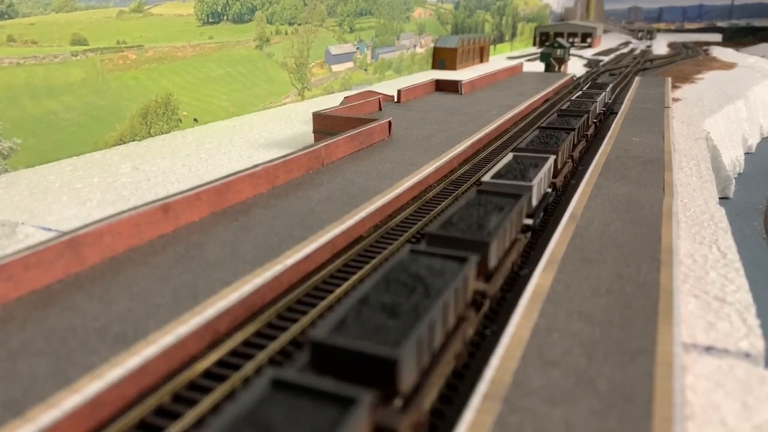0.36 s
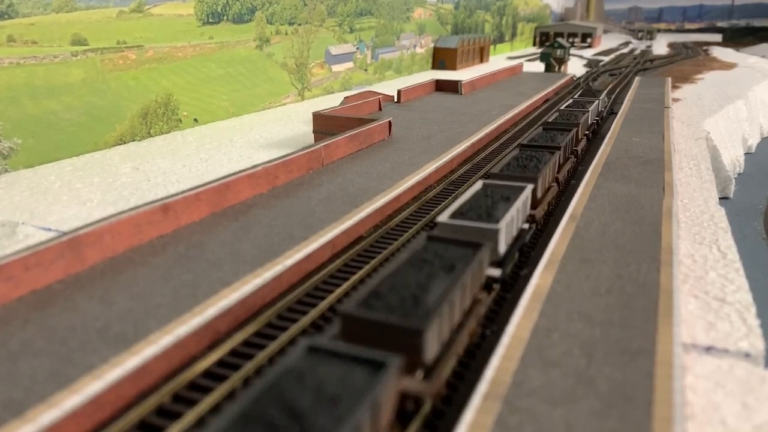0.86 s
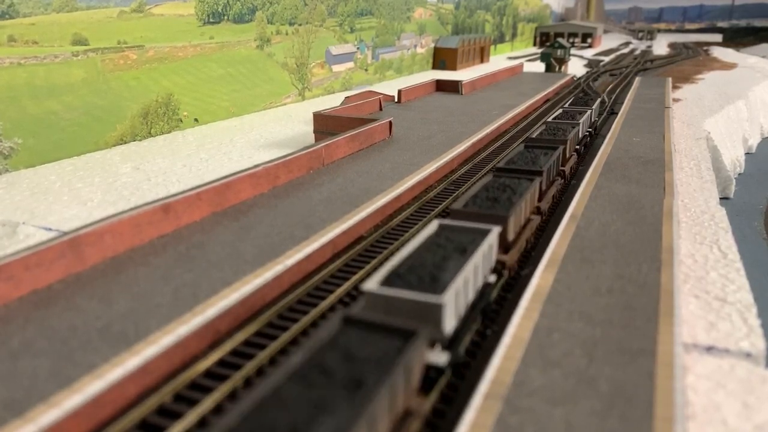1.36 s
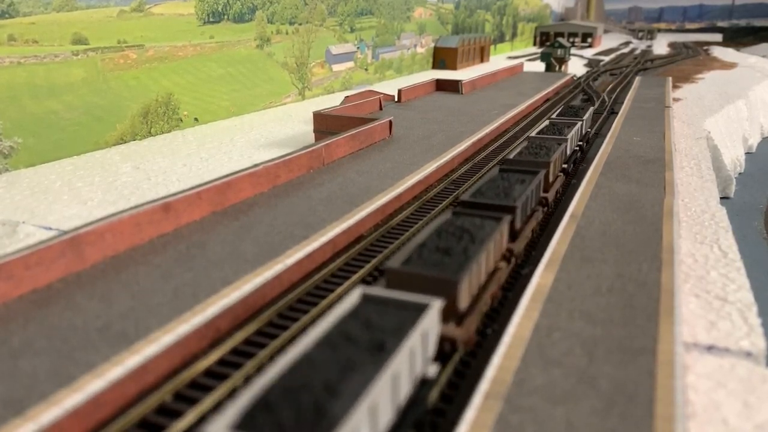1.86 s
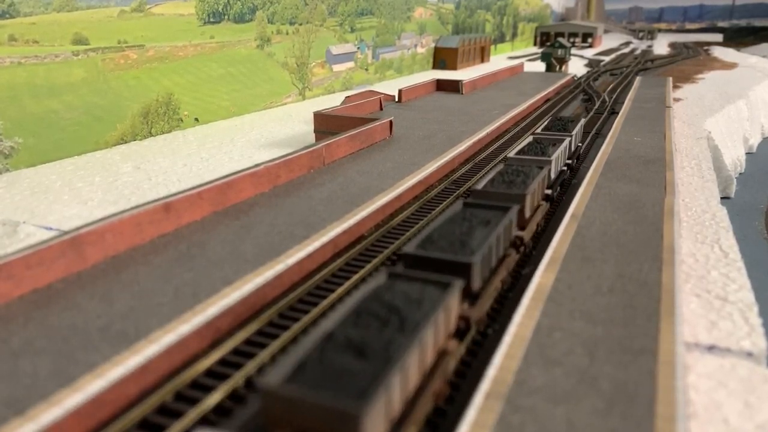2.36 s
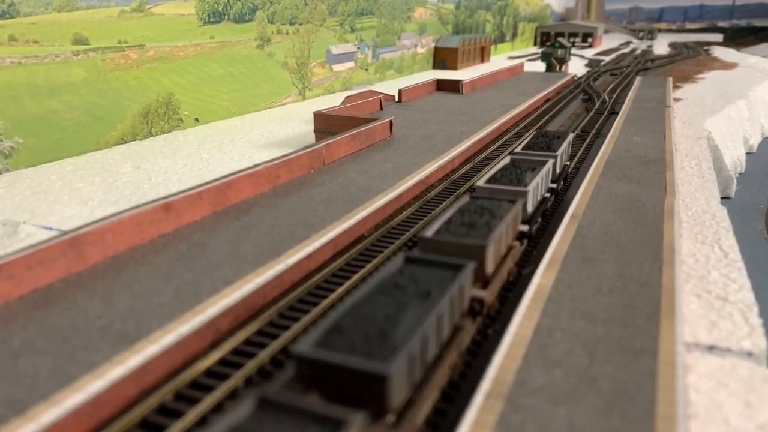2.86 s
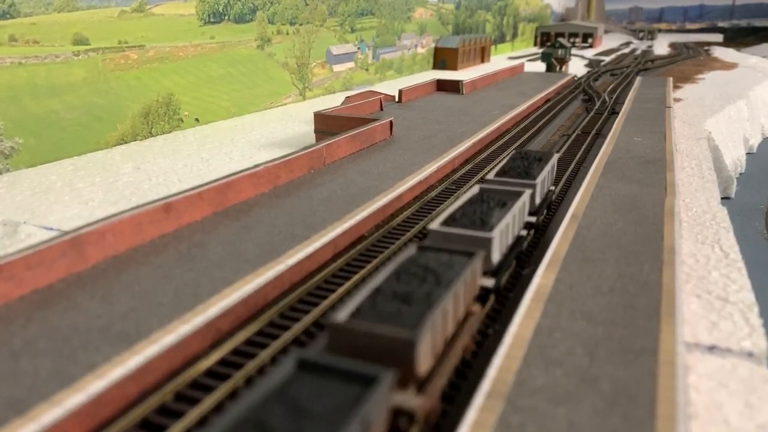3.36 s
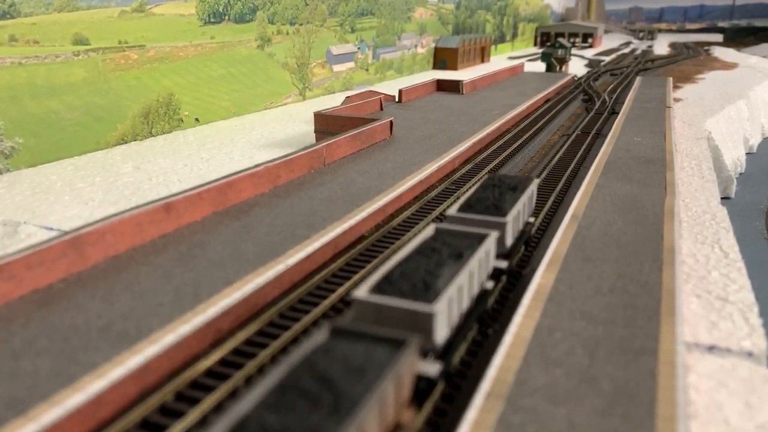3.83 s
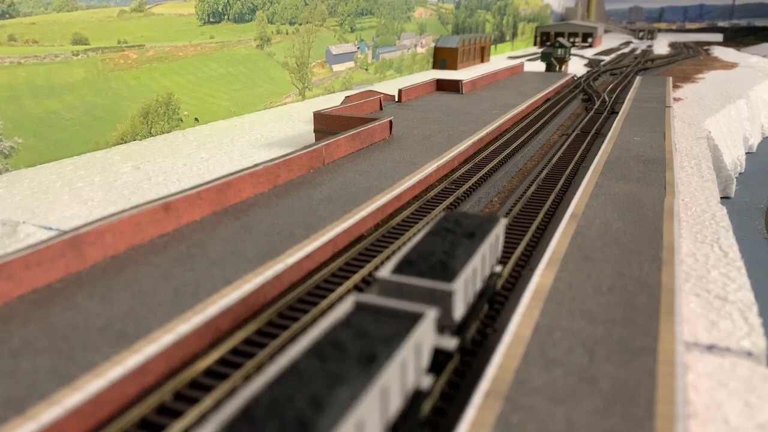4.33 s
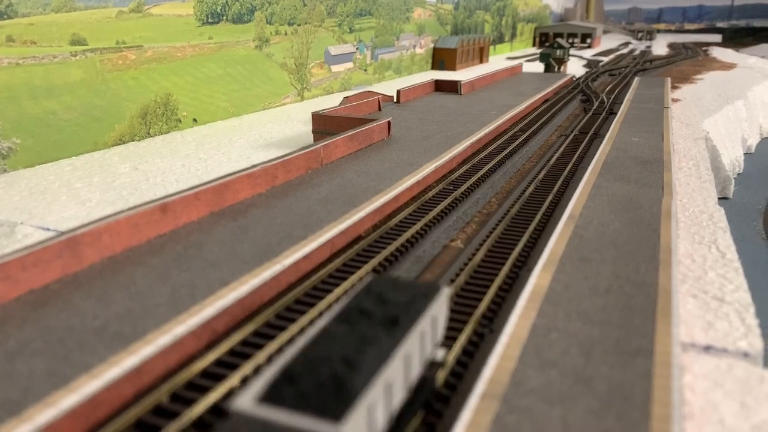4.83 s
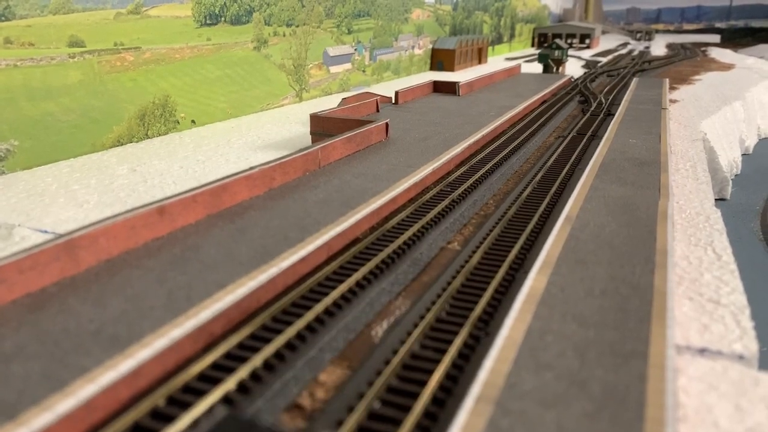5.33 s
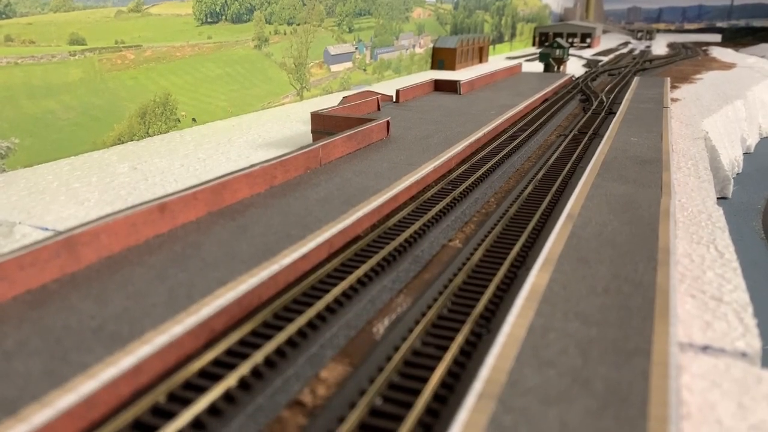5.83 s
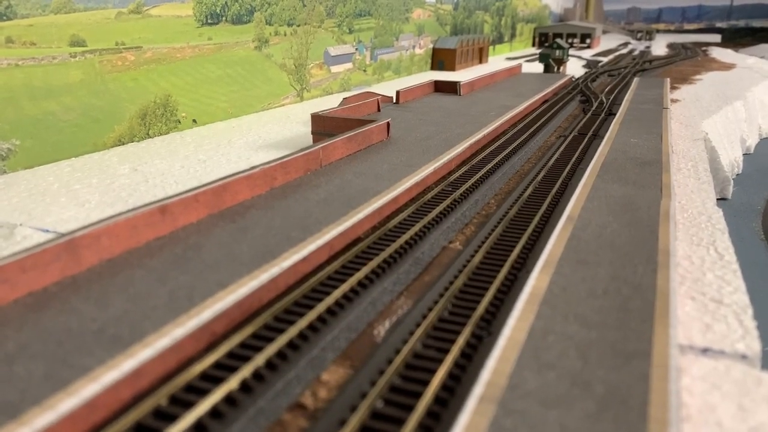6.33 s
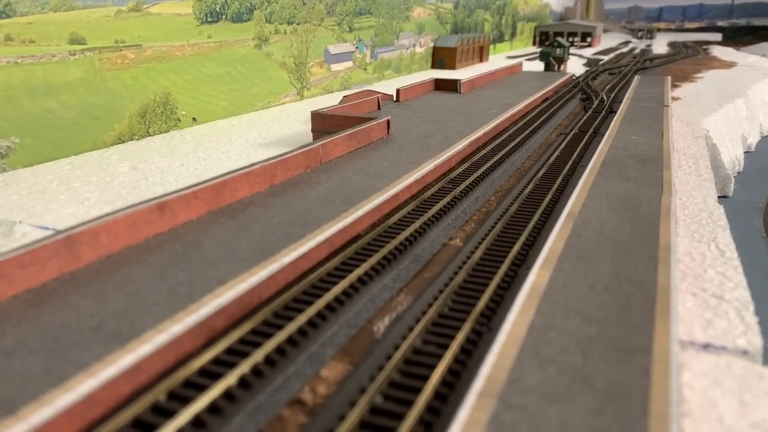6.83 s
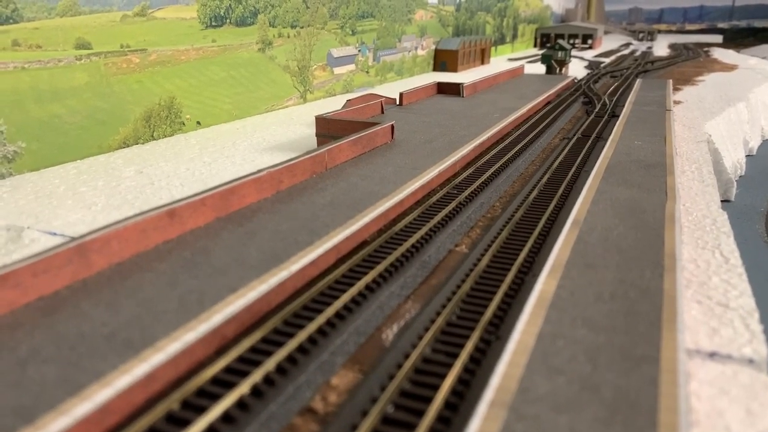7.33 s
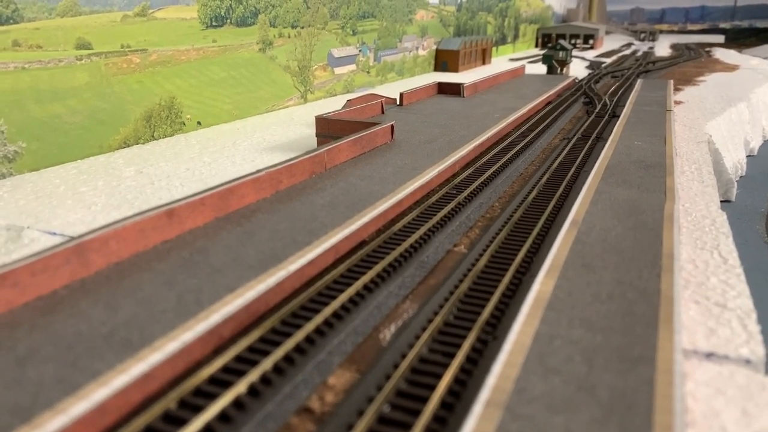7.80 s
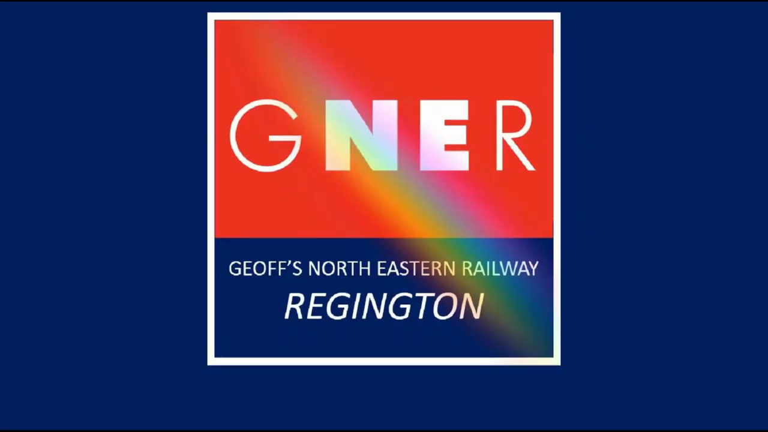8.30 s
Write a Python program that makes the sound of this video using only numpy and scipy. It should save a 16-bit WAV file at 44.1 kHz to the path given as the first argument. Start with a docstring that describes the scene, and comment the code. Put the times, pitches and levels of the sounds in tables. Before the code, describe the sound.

Close, buzzy motor rattle of a toy train with a fast throb, thin metallic wheel hiss and irregular joint clicks, then sudden silence.

```python
"""In a room, a small model train runs along its track, then the sound is cut to silence.
The drive is knocks and noise ringing a shell, throbbing with a gear; its echoes shorten as the train
moves on, so that the comb slides upward. Shaped noise and grit make the hiss of metal wheels, low
noise the rumble of the baseboard, and short snaps with a low ring the ticks of the rail joints."""
import sys
import numpy as np
from scipy import signal
from scipy.fft import rfft, irfft
from scipy.io import wavfile
from scipy.ndimage import uniform_filter1d

SR = 44100
rng = np.random.default_rng(int(sys.argv[2]) if len(sys.argv) > 2 else 0)


def makeup_ratio(level_db):
    """Linear amplitude ratio for a level in decibels (20 dB per factor of ten)."""
    decades = np.asarray(level_db, float) / 20
    return 10 ** decades


def dump_mix(stems):
    """Bounce the given channels to the path in sys.argv[1] as a 16-bit WAV at rate SR."""
    frames = np.atleast_2d(stems).T  # one column per channel
    limited = np.clip(frames, -1, 1)  # hard clip at full scale
    pcm = np.round(limited * 32767).astype(np.int16)
    wavfile.write(sys.argv[1], SR, pcm)


N = 382788
TIME = np.arange(N) / SR
FRAME, HOP = 2048, 512  # short-time spectra, in samples
HZ = np.fft.rfftfreq(FRAME, 1 / SR)
CUT_S = 7.957  # the sound stops here

# how near the train is as it draws away: (time [s], nearness [dB])
NEARNESS = [(0, 3.5), (.5, 1), (2.5, .5), (3, -.5), (4, .5), (5, 0), (6, -1.5), (7.5, -2), (7.96, -0.5)]
# pressure of the gear over a turn: (cycles per turn, depth [dB], phase [rad])
GEAR_THROB = [(1, 1.5, 1.2), (2, 2.0, 0), (4, .7, -.4)]
# the drive loses a third of a turn on the way: (time [s], lead [turns])
GEAR_LEAD_TURNS = [(0, 0.013), (3.6, 0.036), (5.2, 0.032), (5.5, -0.33), (8, -0.26)]
# echoes off the baseboard and walls, negative strength = inverted:
# (delay at start [ms], delay at end [ms], relative strength at start, relative strength at end)
ECHO_PATHS = [(0.417, 0.321, -0.44, 0.47), (1.123, 0.684, 0.43, -0.13), (1.343, 0.333, 0.21, -0.04),
              (1.627, 1.368, 0.06, -0.28), (1.773, 0.409, -0.23, 0.22), (2.228, 0.938, -0.29, 0.09),
              (2.452, 2.042, -0.06, -0.17), (2.945, 1.44, -0.12, -0.04), (3.269, 2.201, -0.11, -0.04),
              (4.396, 2.308, -0.08, -0.06), (5.366, 2.881, -0.11, 0.2), (5.725, 2.483, 0.02, -0.18),
              (5.956, 2.213, 0.1, 0.23), (6.292, 3.293, 0.03, 0.13), (6.767, 4.479, 0.08, 0.05),
              (6.818, 3.077, -0.07, -0.14)]
# broad colour of the rattling shell: (frequency [Hz], relative density [dB per Hz])
RATTLE_COLOUR = [(300, -26), (650, -20.5), (800, -8), (1100, -4), (1600, -7), (2300, -3.5), (2700, -7),
                 (2830, -8.5), (3050, -6), (3600, -18.5), (4500, -22), (6000, -42.5)]
# resonances of the shell: (centre [Hz], width [Hz], height above the broad colour [dB])
SHELL_RESONANCES = [(788.6, 28, 10), (1005.3, 74, 12), (1227.6, 56.5, 14), (1374, 34.5, 11.5),
                    (1497, 49, 7.5), (1660, 56, 8.5), (1836, 46, 7.5), (2058, 66, 11), (2296, 42, 10),
                    (2414, 110, 6), (2653, 79, 6), (2972, 100, 2.5), (3080, 52, 3.5), (3452, 150, 7.5)]
# low parts of a throb come late, negative = early: (frequency [Hz], lag [ms])
THROB_LAG = [(700, 4), (1100, 4), (1900, 0.5), (2700, -6), (4000, -2)]
# colour of wheels rolling on rails: (frequency [Hz], relative density [dB per Hz])
HISS_COLOUR = [(2500, -23.5), (3300, -5), (3700, -2.5), (4100, -0.5), (4920, -9), (5550, -5.5), (6630, -9),
               (7520, -13.5), (8330, -13.5), (9940, -18.5), (11700, -27), (13300, -25), (14900, -25.5),
               (15900, -32)]
# colour of the low roll in the baseboard: (frequency [Hz], relative density [dB per Hz])
RUMBLE_COLOUR = [(12, -33), (20, -10), (40, -3), (55, -10.5), (120, -2.5), (190, -4), (260, -0.5),
                 (330, -3), (430, -1), (500, -4.5), (700, -2.5), (910, -26), (1540, -93)]
# two baseboard resonances, hum then drone: (centre [Hz], width [Hz])
BOARD_RESONANCES = [(150, 40), (40, 40)]
# those resonances come and go: (time [s], hum lift [dB], deep drone lift [dB])
BOARD_LIFTS = [(0, 1.5, 3), (.8, 8, -.6), (5.3, 3, -3), (6, 4.5, 5.5), (7, 5.5, 2), (7.96, -0.5, -1.5)]
# the clearer ticks of wheels over rail joints:
# (time [s], snap peak [dB], low ring against the snap [dB], treble tilt of the snap [dB])
JOINT_TICKS = [(0.041, -29.5, -2.5, 0), (0.2952, -31, 5, -3), (0.8876, -31.5, -4, 7),
               (0.9867, -26.5, 3, -1), (1.9674, -29, -7, -5.5), (2.1026, -25.5, -2, 5.5),
               (2.387, -27, -14, 5.5), (2.479, -29, 3, -5), (2.7202, -30, -7, -0.5), (3.0016, -25, -6, 3.5),
               (3.027, -27.5, -3, 1), (3.0902, -30.5, 3.5, -3), (3.3762, -31.5, -11, -5),
               (3.615, -30, -17, -4.5), (3.689, -29, -8, 1), (3.7115, -27, -2, -2),
               (3.9484, -25.5, -4, 6.5), (4.0277, -32, -6, 2), (4.0527, -33, -5, 0), (4.2338, -26, -10, 0),
               (4.3286, -28.5, 1, -3), (4.6443, -32.5, -9, -5.5), (4.8509, -24, -3.5, 2),
               (4.9172, -27.5, -5, 0), (4.9442, -31.5, 5, -3), (5.1791, -31.5, 7, -0.5),
               (5.253, -30.5, -3, -2), (5.2819, -29.5, 0, 0.5), (5.5293, -32, -2, -5),
               (6.0761, -27, -13, 0), (6.143, -27, 0, 1.5), (6.4213, -28, 0, -3), (6.481, -28, 6, 0),
               (6.756, -30, 8, 3), (6.7654, -27.5, -5.5, -1), (6.8176, -23, 6.5, -6),
               (6.8224, -27.5, -13, -1.5), (7.0983, -28.5, -1, 0), (7.1581, -22, 5, -4),
               (7.2878, -20.5, -12, 10), (7.3336, -31, 7, 5), (7.3577, -32, -3, 2), (7.38, -25, -5, 1.5),
               (7.6236, -25.5, -2.5, 0), (7.901, -23.5, -9, 6.5)]
# colour of a snap: (frequency [Hz], relative density [dB per Hz])
SNAP_COLOUR = [(2500, -42.5), (4500, -3), (6000, -1), (8200, 0), (10500, -7), (12000, -16.5),
               (14000, -12.5), (16000, -24)]
# low ring after a snap: (nominal frequency [Hz], relative level [dB], decay by 60 dB [s])
WHEEL_RING = [(796, -12.5, 0.025), (2540, 2.5, .011), (3380, 3, .009), (3820, 3, 0.01), (4560, -4, 0.008)]


def evened(x):
    """Scales to rms 1."""
    return x / np.sqrt(np.mean(x ** 2) + 1e-20)


def read(points, hz):
    """Reads a spectrum on a log-frequency axis."""
    f, value = np.transpose(points)
    return np.interp(np.log(hz + 1), np.log(f + 1), value)


def resonance(centre_hz, width_hz):
    """A bell of height 1 over frequency."""
    return 1 / (1 + (2 * (HZ - centre_hz) / width_hz) ** 2)


def level(db, follow):
    """Gain over time of a layer; follow is its dB per dB of nearness."""
    return makeup_ratio(db + follow * np.interp(TIME, *np.transpose(NEARNESS)))


def causal(db):
    """The minimum-phase response with this gain: it rings after its cause, never before."""
    half = FRAME // 2
    cepstrum = irfft(db * np.log(10) / 20)
    cepstrum[1:half] *= 2
    cepstrum[half + 1:] = 0
    return np.exp(rfft(cepstrum))


def filtered(x, response):
    """Multiplies short-time spectra by response(frame times)."""
    _, t, z = signal.stft(x, SR, nperseg=FRAME, noverlap=FRAME - HOP)
    return signal.istft(z * response(t), SR, nperseg=FRAME, noverlap=FRAME - HOP)[1][:N]


def patchy(x, depth_db, size=256):
    """Loose parts shake on their own: spectral patches swell and sink, narrower and longer at larger size."""
    overlap = size * 3 // 4
    z = signal.stft(x, nperseg=size, noverlap=overlap)[2]
    patches = rng.standard_normal(z.shape[::-1]).T
    patches = uniform_filter1d(patches, size=3, axis=0)  # across frequency
    patches = uniform_filter1d(patches, size=16, axis=1)  # across time
    return signal.istft(z * makeup_ratio(depth_db * evened(patches)), nperseg=size, noverlap=overlap)[1][:N]


def drift(top_hz):
    """Slow random wander of rms 1, mostly below top_hz."""
    slow = 1 / (1 + (np.fft.rfftfreq(N, 1 / SR) / top_hz) ** 4)
    return evened(irfft(rfft(rng.standard_normal(N)) * slow, N))


def knocks(per_s, spread_db):
    """Tiny impacts at random moments, a few of them large."""
    size = makeup_ratio(spread_db * np.minimum(rng.exponential(1, N), 5))
    sign = rng.choice([-1., 1.], N)
    return evened(size * sign * (rng.random(N) < per_s / SR))


def throb_db():
    """The gear is not quite round: its pressure rises and falls within each turn."""
    gear_hz = 10.95
    turns = gear_hz * TIME + np.interp(TIME, *np.transpose(GEAR_LEAD_TURNS))
    return sum(depth * np.cos(k * 2 * np.pi * turns + phase) for k, depth, phase in GEAR_THROB)


def faint_echoes():
    """Weaker, mostly longer paths that shorten by about the same share as the strong ones."""
    count, top_strength = 14, 0.12
    start_ms = rng.uniform(4, 16, count)
    end_ms = start_ms * rng.uniform(0.45, 0.65, count)
    first, last = rng.uniform(0, top_strength, (2, count))
    return list(zip(start_ms, end_ms, first, last))


def comb(t):
    """Direct sound plus echoes whose delays and strengths glide steadily as the train moves."""
    echo_gain, top_hz = 1.22, 4300  # echoes fade above top_hz
    fade = echo_gain / (1 + (HZ / top_hz) ** 8)
    gone = t / 8  # share of the run
    way = gone + 0.07 * gone * (1 - gone)  # the delays shrink a little faster at first
    paths = np.ones((len(HZ), len(t)), complex)
    for start_ms, end_ms, first, last in ECHO_PATHS + faint_echoes():
        delay_s = (start_ms + (end_ms - start_ms) * way) / 1000
        strength = first + (last - first) * gone
        paths += np.outer(fade, strength) * np.exp(-2j * np.pi * np.outer(HZ, delay_s))
    return paths


def drive(throb):
    """Gear knocks and rubbing noise ring the shell and reach the microphone by several paths."""
    diffuse = 0.22  # strength of the sound that arrives scattered
    bumps_db = sum(db * resonance(hz, width) for hz, width, db in SHELL_RESONANCES)
    # summing the lag over frequency gives the phase that delays each band
    late = np.exp(-2j * np.pi * np.cumsum(read(THROB_LAG, HZ)) * HZ[1] / 1000)
    shell = (causal(read(RATTLE_COLOUR, HZ) + bumps_db) * late)[:, None]

    push = makeup_ratio(throb + 0.5 * drift(6))
    rub = push * (rng.standard_normal(N) + 0.43 * knocks(500, spread_db=4))
    rub = patchy(rub, 1.8)
    rub = patchy(rub, 1.64, size=1024)  # each resonance comes and goes
    scattered = push * rng.standard_normal(N)

    paths = comb(np.arange(N // HOP + 2) * HOP / SR)
    # the shell sets the mean colour, the comb adds only its moving part
    log_power = np.log(abs(paths) ** 2 + diffuse ** 2)
    mean = np.exp(log_power.mean(1, keepdims=True) / 2)
    combed = filtered(evened(rub), lambda t: shell * paths[:, :len(t)] / mean)
    haze = filtered(evened(scattered), lambda t: shell / mean)
    return level(-31, follow=0.45) * evened(combed + diffuse * haze)


def wheel_hiss(throb):
    """Many metal wheels on metal rails: hiss with fine grit, partly shaken by the drive."""
    shake = makeup_ratio(0.21 * throb + drift(30))
    rolling = shake * (rng.standard_normal(N) + 0.46 * knocks(240, spread_db=3))
    edge_hz, edge_width_hz = 4000, 1100
    edge = np.exp(-((HZ - edge_hz) / edge_width_hz) ** 2)
    body = causal(read(HISS_COLOUR, HZ))[:, None]

    def colour(t):
        """The lower edge of the hiss thins out, in dB per second."""
        return body * makeup_ratio(np.outer(edge, 1 - 0.56 * t))

    return level(-47.5, follow=1.3) * evened(filtered(patchy(rolling, 1.6), colour))


def rumble():
    """The baseboard carries the low roll of the train, its two resonances coming and going."""
    roll = patchy(makeup_ratio(0.84 * drift(25)) * rng.standard_normal(N), 0.79)
    seconds, *lifts_db = np.transpose(BOARD_LIFTS)
    shapes = [resonance(hz, width) for hz, width in BOARD_RESONANCES]
    body = causal(read(RUMBLE_COLOUR, HZ))[:, None]

    def colour(t):
        """Hum and drone lifted over the steady body."""
        lift_db = sum(np.outer(shape, np.interp(t, seconds, db)) for shape, db in zip(shapes, lifts_db))
        return body * makeup_ratio(lift_db)

    return level(-46, follow=1.1) * evened(filtered(roll, colour))


def small_ticks():
    """Faint ticks of the far wheels at random moments, with the columns of the clear ones."""
    count = 36
    when = rng.uniform(0, CUT_S, count)
    peak_db = -37.5 + rng.uniform(-3, 3, count)
    low_db = -4 + rng.uniform(-5, 5, count)
    return list(zip(when, peak_db, low_db, rng.uniform(-4, 4, count)))


def snap(t, treble_db):
    """One sharp wide blow with its brief chatter, peak 1."""
    blow = 0.22 * rng.standard_normal(len(t)) * makeup_ratio(-60 * abs(t - 0.001) / 0.005)
    blow[44] += 1  # the blow itself, 1 ms in
    treble = np.clip((HZ - 9000) / 4000, 0, 1)
    click = irfft(causal(read(SNAP_COLOUR, HZ) + treble_db * treble))[:256]
    out = np.convolve(blow, click)[:len(t)]
    return out / abs(out).max()


def low_ring(t):
    """A few decaying modes, slightly retuned for each tick, peak 1."""
    hz, db, t60 = np.transpose(WHEEL_RING)[:, :, None]
    detune = 1 + 0.036 * rng.standard_normal(hz.shape)
    modes = makeup_ratio(db - 60 * t / t60) * np.sin(2 * np.pi * hz * detune * t)
    out = modes.sum(0) * np.minimum(t / 0.0011, 1) ** 3  # soft onset
    return out / abs(out).max()


def joints():
    """Each joint gives a sharp wide snap and a brief low ring; a few near reflections follow."""
    t = np.arange(1024) / SR
    out = np.zeros(N + 3000)
    for s, peak_db, low_db, treble_db in JOINT_TICKS + small_ticks():
        tick = snap(t, treble_db) + makeup_ratio(low_db) * low_ring(t)
        out[round(s * SR):][:len(t)] += makeup_ratio(peak_db) * tick
    near = np.exp(-t / 0.0036) * rng.standard_normal(len(t)) * (t > 0.0008)
    near /= np.linalg.norm(near)
    return out[:N] + makeup_ratio(-10) * signal.oaconvolve(out, near)[:N]


def scene():
    """The train drawing away, cut off abruptly."""
    throb = throb_db()
    train = drive(throb) + wheel_hiss(throb) + rumble() + joints()
    cut = np.clip((CUT_S - TIME) / 0.0008, 0, 1)
    return (train * cut)[None]


def band_limit(x):
    """A steep low-pass at the top of the band."""
    return signal.sosfilt(signal.butter(12, 16020, fs=SR, output="sos"), x)


def record(dry):
    """Turns the finished mix into the delivered sound."""
    return band_limit(dry)


dry = scene()
out = record(dry)
dump_mix(out)
```